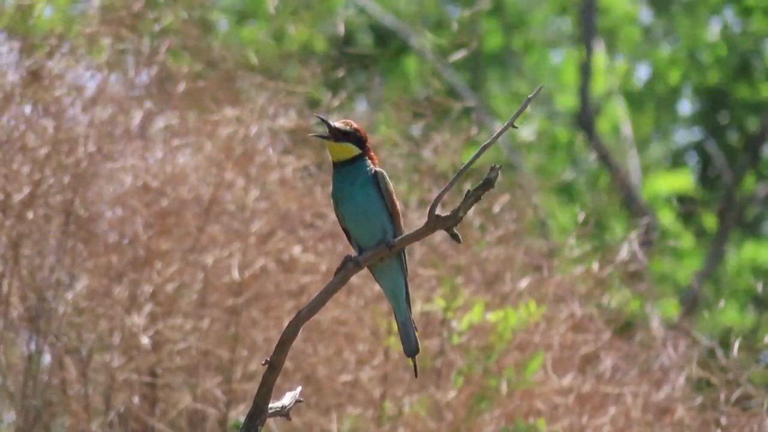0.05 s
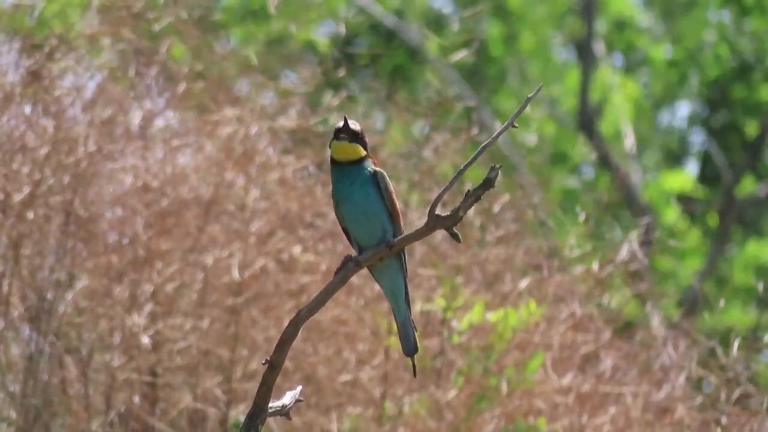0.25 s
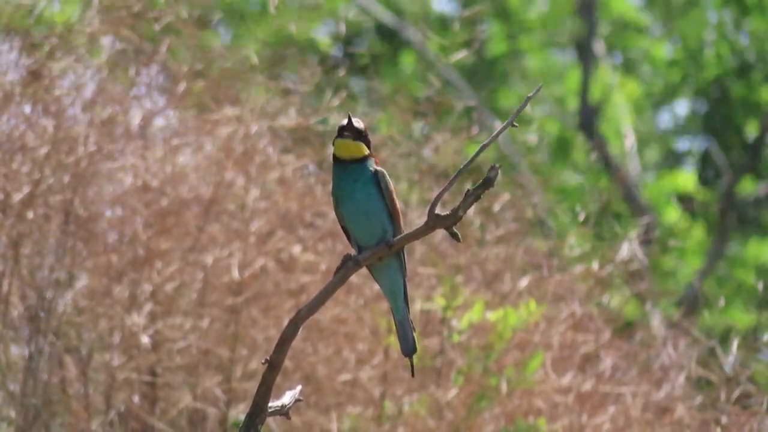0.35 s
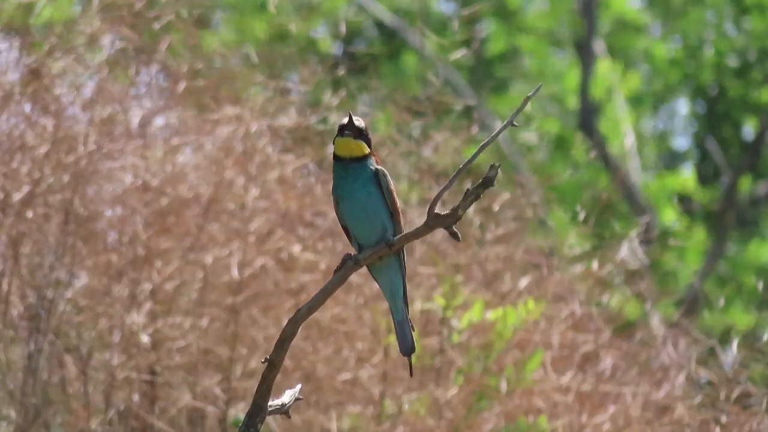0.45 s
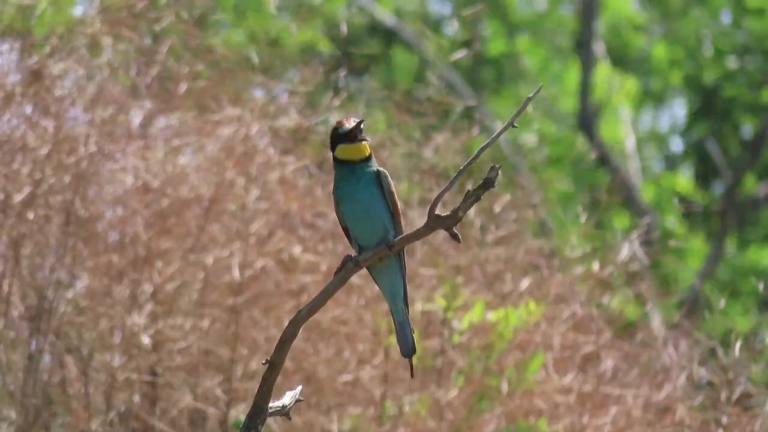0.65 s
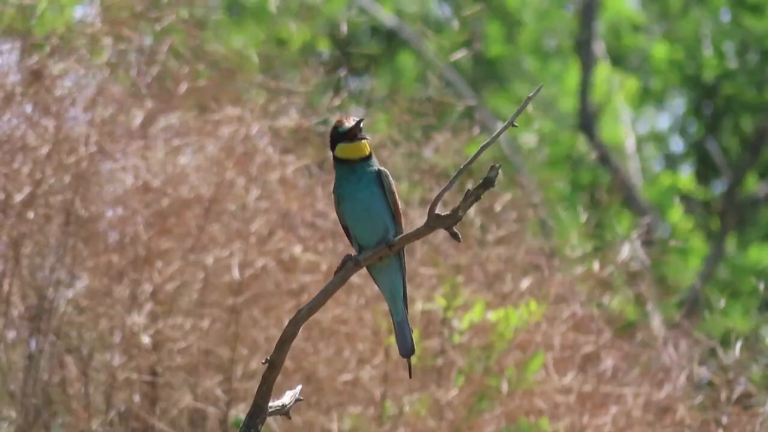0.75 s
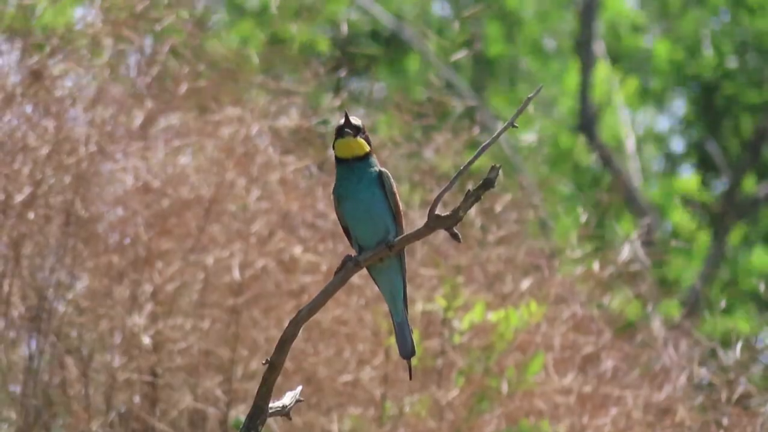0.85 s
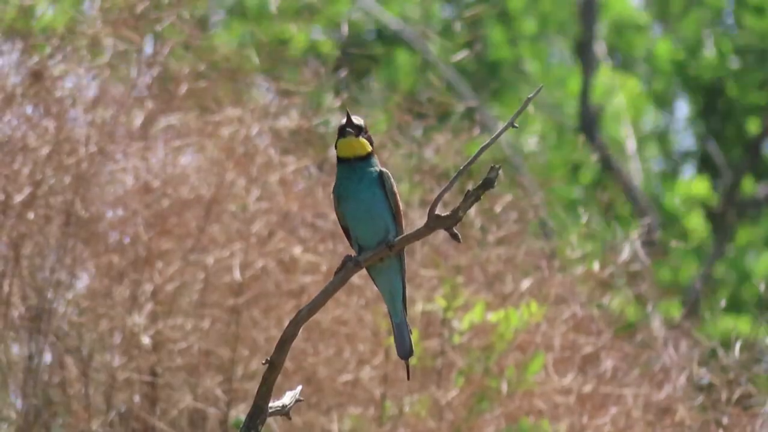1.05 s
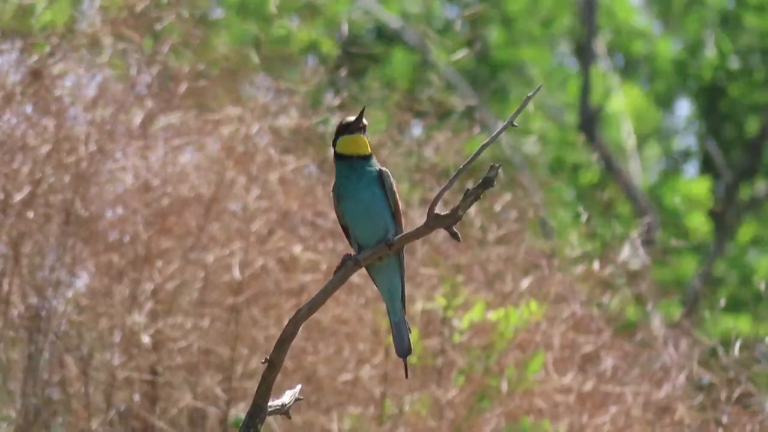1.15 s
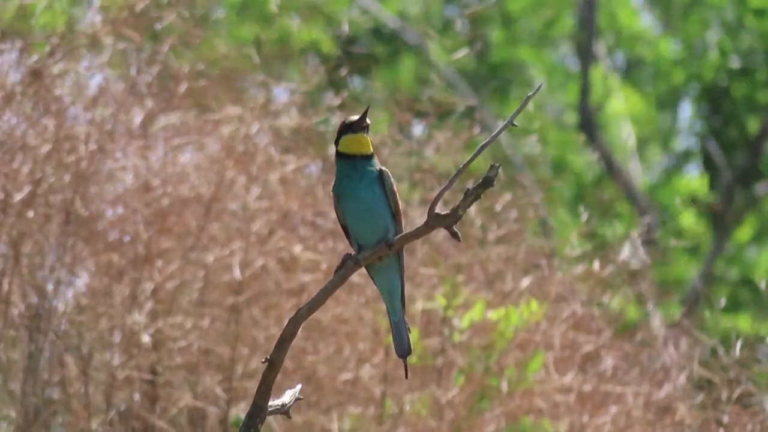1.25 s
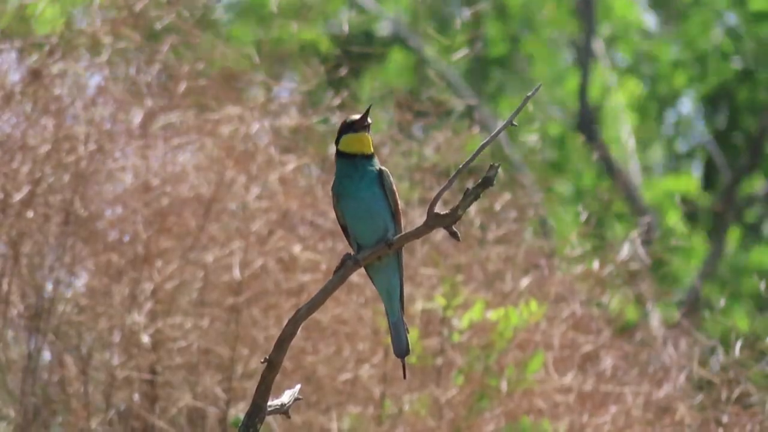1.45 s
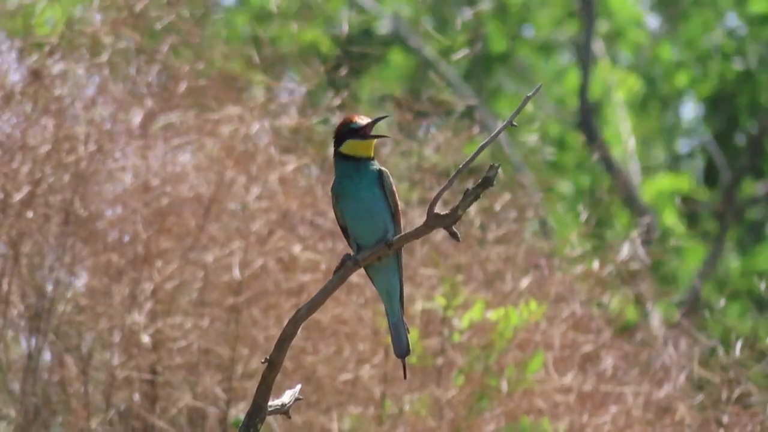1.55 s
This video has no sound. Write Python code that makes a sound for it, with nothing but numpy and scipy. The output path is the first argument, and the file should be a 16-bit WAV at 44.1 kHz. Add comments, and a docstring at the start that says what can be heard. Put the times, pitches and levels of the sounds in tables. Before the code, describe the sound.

Soft bee-eater calls: three rolling whistles with rapid upward flicks run together from 0.1 to 0.33 seconds, another at 0.55, a shorter one near 0.87 and a faint rough chip at 1.12. Fainter, mostly higher birds answer behind with slight tree echo. Low wind gusts buffet the microphone around 0.4 and 1.18, over steady distant traffic-like rush, rumble, grassy breeze, hiss and faint insect buzz.

```python
"""Bee-eaters call softly in open country: low whistled notes that flick quickly upward.
Each note is a wavering tone with quick upward bumps in pitch; farther birds give fainter, mostly higher notes.
Behind them, shaped noise makes a steady distant rush like traffic, a low rumble, a grassy breeze and hiss.
A narrow band of pulsing noise makes a thin insect buzz.
Two gusts of wind buffet the microphone, made from low noise that follows a loudness curve."""
import sys
import numpy as np
from scipy import signal
from scipy.fft import rfft, irfft, next_fast_len
from scipy.io import wavfile
from scipy.ndimage import uniform_filter1d, map_coordinates

SR = 44100
rng = np.random.default_rng(int(sys.argv[2]) if len(sys.argv) > 2 else 0)


def int16_out(signal):
    """Quantize to a 16-bit WAV file."""
    q = np.round(np.clip(np.atleast_2d(signal).T, -1, 1) * 32767)
    wavfile.write(sys.argv[1], SR, q.astype(np.int16))


N = 70560  # samples: 1.6 s

# Spectra below give relative strength only: noise() evens out the overall level.
# Likeness: 1 = same sound left and right, 0 = unrelated, -1 = opposite.

# Wind gusts, before a small trim: (time [s], level [dB])
GUST_LEVEL = [(0.0, -43.5), (0.08, -39), (0.11, -46), (0.28, -40.5), (0.306, -30), (0.4, -19.5),
              (0.418, -25.5), (0.462, -31), (0.552, -26), (0.588, -36), (0.654, -28.5), (0.69, -43.5),
              (0.872, -39), (0.935, -35), (0.953, -24.5), (0.998, -38.5), (1.032, -27.5), (1.068, -37.5),
              (1.126, -33), (1.18, -18), (1.26, -29.5), (1.282, -36.5), (1.31, -32.5), (1.354, -39.5),
              (1.6, -45)]
# Spectrum of the wind buffeting: (frequency [Hz], strength [dB per Hz])
BUFFET_SPECTRUM = [(12, -7.5), (28, -6), (55, 2), (80, -5), (130, -8), (200, -18.5), (300, -28.5),
                   (600, -32), (2000, -102), (6000, -120)]
# Left-right likeness of wind and rumble: (frequency [Hz], likeness [-1 to 1])
BUFFET_ALIKE = [(40, 0.98), (120, 1), (300, 0.43)]
BUFFET_TRIM_DB, BUFFET_EVEN_S, WIND_LEAN_DB = -0.5, 0.04, 1.26

# Spectrum of the distant rush: (frequency [Hz], strength [dB per Hz])
RUSH_SPECTRUM = [(88, -76), (150, -12.5), (200, -5.5), (307, -2), (399, -4.5), (434, -5), (501, -3),
                 (675, -2), (708, 1.5), (827, -1.5), (899, 0), (1210, -7), (1360, -8.5), (1450, -12),
                 (2600, -20.5), (3380, -41), (5720, -120)]
# Loudness of the rush, before a small trim: (time [s], level [dB])
RUSH_LEVEL = [(0.0, -39), (1.056, -41), (1.474, -40.5), (1.528, -41), (1.6, -40)]
# Left-right likeness of rush and breeze: (frequency [Hz], likeness [-1 to 1])
RUSH_ALIKE = [(150, 1), (340, 0.41), (560, 0.95), (720, 1), (850, 0.8), (1050, 0.86), (1500, 0.65),
              (2500, 0.6)]
# Droning bands in the rush: (centre [Hz], width [Hz], level [dB])
DRONES = [(520.7, 39, -54), (546, 20, -60.5), (714, 55, -53.5), (1009, 125, -51)]
RUSH_TRIM_DB, BACKGROUND_LEAN_DB = -0.5, -1.5

# Spectrum of the breeze in the grass: (frequency [Hz], strength [dB per Hz])
RUSTLE_SPECTRUM = [(700, -42), (1100, -9), (1320, 3), (1550, -3), (2200, -9.5), (3200, -13), (6000, -57)]
# Loudness of that breeze: (time [s], level [dB])
RUSTLE_LEVEL = [(0, -64), (0.3, -49), (0.5, -50.5), (0.8, -48), (1.0, -58), (1.25, -51.5), (1.6, -71)]

# Spectrum of the far low rumble: (frequency [Hz], strength [dB per Hz])
RUMBLE_SPECTRUM = [(15, -25), (35, -22), (55, 4.5), (80, -15.5), (130, -12), (200, -6.5), (300, -33.5),
                   (700, -75)]
# Swell and fade of a low drone in the rumble: (time [s], level [dB])
LOW_DRONE_LEVEL = [(0.8, -57), (1.0, -39.5), (1.32, -42), (1.46, -48), (1.6, -54)]
RUMBLE_DB, LOW_DRONE_HZ, LOW_DRONE_WIDTH_HZ = -48, 150, 117

# Spectrum of the hiss: (frequency [Hz], strength [dB per Hz])
HISS_SPECTRUM = [(1200, -28), (2600, 0.5), (4000, -1), (5500, -4), (7300, -7), (9000, -9.5), (11000, -14.5),
                 (14000, -21.5), (15700, -30)]
# Left-right likeness of the hiss: (frequency [Hz], likeness [-1 to 1])
HISS_ALIKE = [(2500, 0.26), (4500, 0.59), (6500, -0.015), (9000, -0.37), (14000, -0.36)]
HISS_DB = -56

INSECT_HZ, INSECT_WIDTH_HZ, INSECT_DB = 7710, 470, -73.5
INSECT_PULSES_PER_S, INSECT_SWING_DB = 54, 8.5  # each pulse swings this far up and down

# Near whistled notes, before flicks, swell and accents:
# (start [s], length [s], opening pitch [Hz], closing pitch [Hz], level [dB],
#  left over right [dB], roughness [0 to 1])
NOTES = [(0.115, 0.078, 1793, 1920, -41.5, 8.5, 0.38), (0.201, 0.069, 1670, 2010, -40.5, -2, 0.47),
         (0.26, 0.068, 1930, 1720, -40.5, -2.3, 0.47), (0.538, 0.12, 1730, 1920, -39, -0.5, 0.25),
         (0.855, 0.059, 1963, 2010, -42, -2, 0.28), (1.114, 0.038, 2040, 1960, -46.5, 2, 0.94)]
# Upward flicks in the notes:
# (top [s], pitch rise [Hz], rise time [s], fall time [s], accent [dB], accent ahead of top [s])
FLICKS = [(0.163, 180, 0.0048, 0.0048, 1, 0.003), (0.25, 550, 0.0044, 0.0062, 10.5, 0.0045),
          (0.2847, 488, 0.00458, 0.0085, 8.5, 0.0024), (0.2977, 360, 0.0026, 0.00465, 6.5, 0.0022),
          (0.592, 675, 0.005, 0.0058, 1, -0.00013), (0.63, 408, 0.0057, 0.0045, 2, 0.0093),
          (0.644, 191, 0.0031, 0.0031, 7, 0.0036), (0.8988, 315, 0.0057, 0.0046, 11.5, -0.0034),
          (1.118, 221, 0.003, 0.0042, 6, 0.0015), (1.128, 170, 0.003, 0.004, 3, -0.0013)]
ATTACK_S, RELEASE_S = 0.008, 0.007
SCOOP_HZ, SCOOP_S = 201.5, 0.00684  # each note starts and ends a little flat
SWELL_DB = 10.5  # a note swells towards its middle
FLICK_SQUARENESS = 2.5  # higher gives a flatter top and steeper sides
ACCENT_S = 0.0065  # half width of an accent
# Waver of a fully rough whistle: share of its pitch, level, and random points a second
JITTER, SHIMMER_DB, FLUTTER_PER_S = 0.035, 5.5, 220

# Notes of farther birds, before the far mix: (start [s], length [s], pitch reached [Hz], level [dB])
FAR_NOTES = [(0.24, 0.021, 2980, -44), (0.384, 0.021, 2990, -45), (0.378, 0.026, 2100, -45.5),
             (0.459, 0.085, 1323, -56), (0.531, 0.02, 3020, -49), (0.671, 0.04, 2100, -52),
             (0.702, 0.027, 2915, -52.5), (0.878, 0.018, 2945, -45.5), (1.083, 0.014, 2040, -53)]
SLIDE_HZ, SLIDE_S, FAR_FADE_S = 650, 0.008, 0.007  # each slides up to its pitch
FAR_ROUGH = 0.937  # roughness, 0 to 1

# Echo from the trees: (frequency [Hz], time to fall by 60 dB [s])
TREE_ECHO = [(500, 0.26), (2500, 0.45), (8000, 0.3)]
ECHO_DELAY_S, SCATTER_S = 0.012, 0.027  # extra wait of the tree echo; longest quick reflection
NEAR_WET_DB, NEAR_SCATTER_DB = -13, -12.5
FAR_DIRECT_DB, FAR_WET_DB, FAR_SCATTER_DB = -3, -0.5, 0.5

TOP_HZ = 15750


def amp(db):
    """Turn decibels into a gain to multiply by."""
    return 10 ** (np.asarray(db) / 20)


def unit(x):
    """Scale to an average strength (rms) of 1."""
    return x / np.sqrt(np.mean(x ** 2) + 1e-20)


def along(points, hz):
    """Read between (Hz, value) points, spacing frequency as a log scale does."""
    f, v = np.transpose(points)
    return np.interp(np.log(hz + 1), np.log(f + 1), v)


def clock():
    """Time of every sample, in seconds."""
    return np.arange(N) / SR


def curve(rows):
    """Join (s, value) rows with straight lines, one value per sample."""
    return np.interp(clock(), *np.transpose(rows))


def wobble(rate):
    """A smooth random curve through `rate` random points a second."""
    return map_coordinates(rng.standard_normal(4096), [clock() * rate], mode="wrap")


def lean(db):
    """Left and right gains that make the left louder by db."""
    return amp(np.array([[db], [-db]]) / 2)


def filtered(x, response):
    """Change the strength (or timing) of each frequency in x."""
    m = next_fast_len(N + SR // 2)  # spare room so the end does not wrap onto the start
    return irfft(rfft(x, m) * response(np.fft.rfftfreq(m, 1 / SR)), m)[..., :N]


def noise(spectrum, alike):
    """Stereo noise of rms 1: a shared part plus a part that is opposite on the two sides."""
    def response(hz):
        turn = np.arccos(np.clip(along(alike, hz), -1, 1)) / 2  # more turn, less likeness
        return amp(along(spectrum, hz)) * [np.cos(turn), np.sin(turn)]

    mid, side = filtered(rng.standard_normal((2, N)), response)
    return unit(np.array([mid + side, mid - side]))


def band(centre_hz, width_hz):
    """Noise of rms 1 kept close to one frequency."""
    def response(hz):
        return 1 / (1 + ((hz - centre_hz) / width_hz * 2) ** 4)

    return unit(filtered(rng.standard_normal(N), response))


def wind():
    """Wind eddies push on the microphone: low noise, as strong as the gust of the moment."""
    eddies = noise(BUFFET_SPECTRUM, BUFFET_ALIKE)
    size = max(int(BUFFET_EVEN_S * SR), 2)
    power = np.mean(eddies ** 2, axis=0)
    power = uniform_filter1d(uniform_filter1d(power, size), size)
    even_eddies = eddies / np.sqrt(np.abs(power) + 1e-9)  # the gust curve now sets the loudness
    return amp(curve(GUST_LEVEL) + BUFFET_TRIM_DB) * even_eddies


def rumble():
    """Far low rumble: bass noise, plus a low noise band that swells and fades."""
    low_drone = amp(curve(LOW_DRONE_LEVEL)) * band(LOW_DRONE_HZ, LOW_DRONE_WIDTH_HZ)
    return amp(RUMBLE_DB) * noise(RUMBLE_SPECTRUM, BUFFET_ALIKE) + low_drone


def distant_rush():
    """Steady far rush: broad noise with a few narrow droning bands."""
    rush = amp(curve(RUSH_LEVEL) + RUSH_TRIM_DB) * noise(RUSH_SPECTRUM, RUSH_ALIKE)
    return rush + sum(amp(db) * band(hz, width) for hz, width, db in DRONES)


def rustle():
    """Breeze in the grass: midrange noise that rises and falls."""
    return amp(curve(RUSTLE_LEVEL)) * noise(RUSTLE_SPECTRUM, RUSH_ALIKE)


def background():
    """Rumble, rush, grass and even high hiss together; rush and grass lean slightly right."""
    hiss = amp(HISS_DB) * noise(HISS_SPECTRUM, HISS_ALIKE)
    return rumble() + lean(BACKGROUND_LEAN_DB) * (distant_rush() + rustle()) + hiss


def insect():
    """A faint high buzz: narrow noise in quick, uneven pulses."""
    phase = 2 * np.pi * INSECT_PULSES_PER_S * clock() + wobble(7.8)  # the wobble makes them uneven
    pulses = amp(INSECT_SWING_DB * np.sin(phase))
    return amp(INSECT_DB) * unit(band(INSECT_HZ, INSECT_WIDTH_HZ) * pulses)


def gate(start, length, attack, release):
    """Fade a note in, hold it, and fade it out smoothly."""
    t = clock() - start
    fade_in = np.sin(np.pi / 2 * np.clip(t / attack, 0, 1))
    fade_out = np.sin(np.pi / 2 * np.clip((length - t) / release, 0, 1))
    return fade_in * fade_out


def whistle(hz, rough):
    """A pure tone of rms 1 whose pitch and level flutter more the rougher it is."""
    rough = np.clip(rough, 0, 1)
    wavering_hz = hz * (1 + rough * JITTER * wobble(FLUTTER_PER_S))
    phase = 2 * np.pi * np.cumsum(wavering_hz) / SR
    return unit(np.sin(phase) * amp(rough * SHIMMER_DB * wobble(FLUTTER_PER_S)))


def branches(x, count=20):
    """Quick reflections from ground and branches: early copies, different on each side."""
    delays = SCATTER_S * rng.uniform(0.0974, 1, (count, 2, 1))
    gains = rng.standard_normal((count, 2, 1))
    t = clock()
    copies = sum(g * np.interp(t - d, t, x, left=0) for d, g in zip(delays, gains))
    return np.std(x) * unit(copies)


def trees(x):
    """Blurred stereo echo: x smeared by noise that dies away at its own speed in each pitch range."""
    hz, t, z = signal.stft(rng.standard_normal((2, SR // 2)), SR, nperseg=256)
    decay = amp(-60 * t / along(TREE_ECHO, hz)[:, None])
    tail = signal.istft(z * decay, SR, nperseg=256)[1]
    wet = signal.fftconvolve(x[None], tail, axes=1)[:, :N]
    delayed = filtered(wet, lambda f: np.exp(-2j * np.pi * f * ECHO_DELAY_S))
    return np.std(x) * unit(delayed)


def near_birds():
    """Whistled notes swell, drift in pitch and flick sharply upward, with a push of loudness by each flick."""
    t, out = clock(), np.zeros((2, N))

    def bump(top, rise, fall):
        width = np.where(t < top, rise, fall)
        return np.exp(-np.abs((t - top) / width) ** FLICK_SQUARENESS)

    flick_hz = sum(hz * bump(top, rise, fall) for top, hz, rise, fall, _, _ in FLICKS)
    accent_db = sum(db * bump(top - ahead, ACCENT_S, ACCENT_S) for top, _, _, _, db, ahead in FLICKS)
    for start, length, open_hz, close_hz, db, lean_db, rough in NOTES:
        from_edge = np.maximum(np.minimum(t - start, start + length - t), 0)  # s to the nearer end
        glide = np.interp(t, [start, start + length], [open_hz, close_hz])
        pitch = glide + flick_hz - SCOOP_HZ * np.exp(-from_edge / SCOOP_S)
        level_db = db + accent_db - SWELL_DB * (1 - 2 * from_edge / length) ** 2
        note = amp(level_db) * gate(start, length, ATTACK_S, RELEASE_S) * whistle(pitch, rough)
        out += lean(lean_db) * note
    voice = out.mean(axis=0)
    return out + amp(NEAR_SCATTER_DB) * branches(voice) + amp(NEAR_WET_DB) * trees(voice)


def far_birds():
    """Short whistles slide up to their pitch, blurred by reflections from branches and trees."""
    out = np.zeros(N)
    for start, length, hz, db in FAR_NOTES:
        pitch = hz - SLIDE_HZ * np.exp(-np.maximum(clock() - start, 0) / SLIDE_S)
        out += amp(db) * gate(start, length, FAR_FADE_S, FAR_FADE_S) * whistle(pitch, FAR_ROUGH)
    return amp(FAR_DIRECT_DB) * out + amp(FAR_SCATTER_DB) * branches(out) + amp(FAR_WET_DB) * trees(out)


def scene():
    """Wind, far background and insect, with the birds over them."""
    return lean(WIND_LEAN_DB) * wind() + background() + insect() + near_birds() + far_birds()


def record(dry):
    """The recorder keeps nothing above its band limit."""
    return filtered(dry, lambda hz: hz < TOP_HZ)


dry = scene()
out = record(dry)
int16_out(out)
```